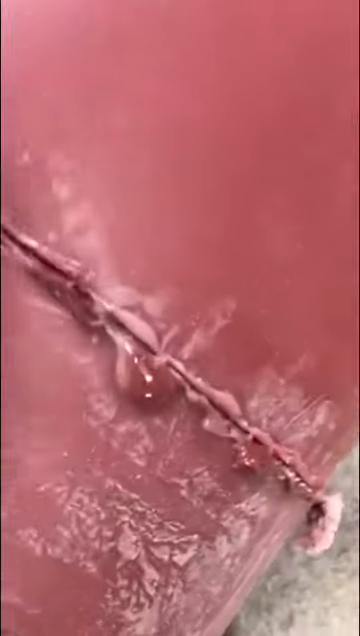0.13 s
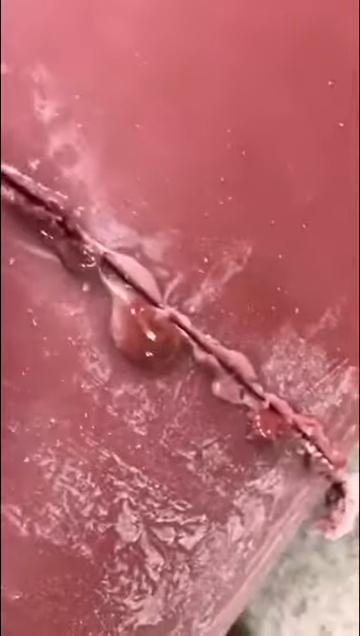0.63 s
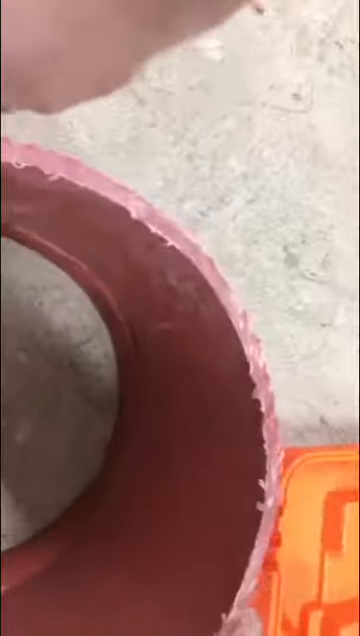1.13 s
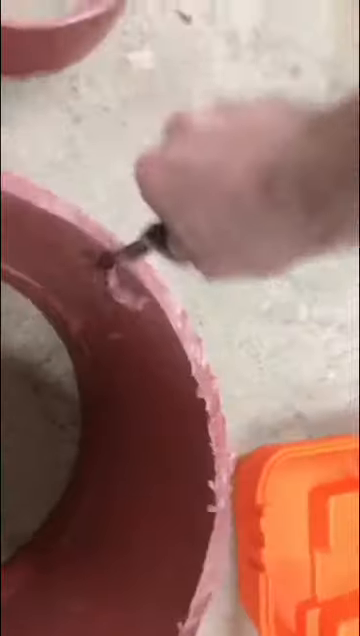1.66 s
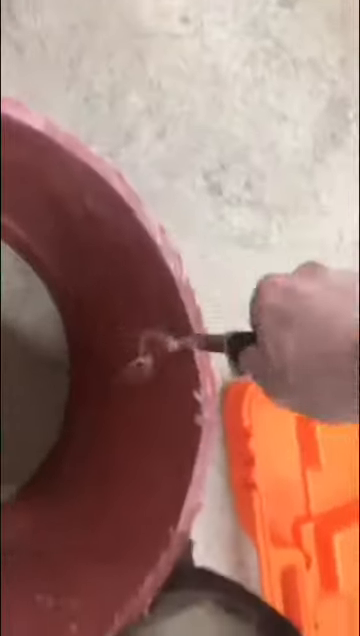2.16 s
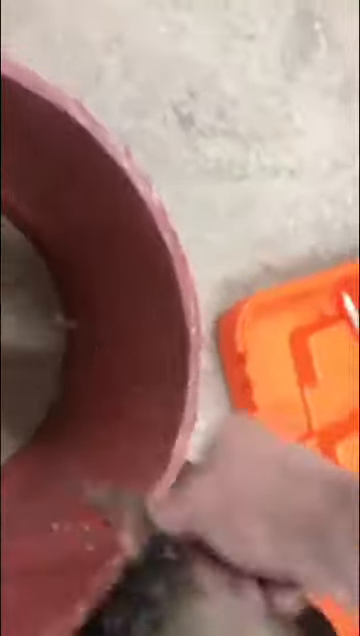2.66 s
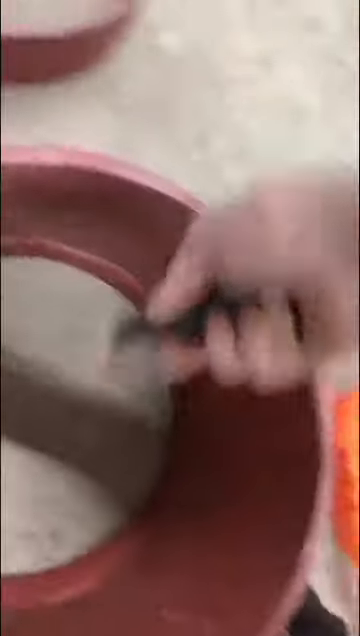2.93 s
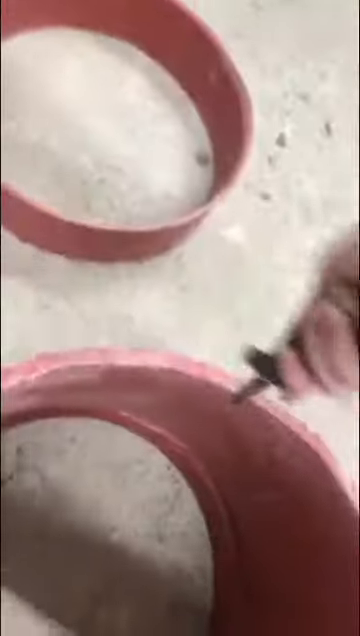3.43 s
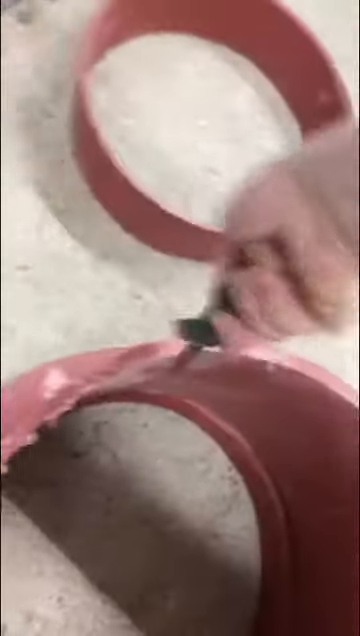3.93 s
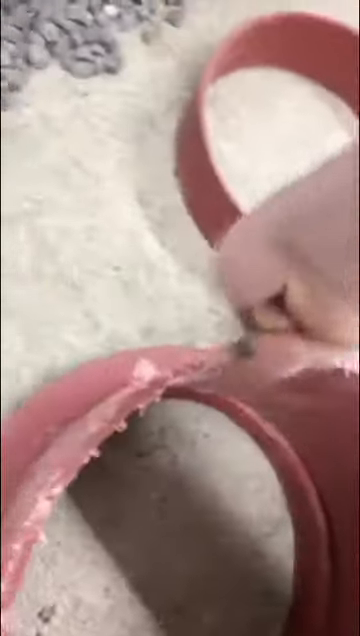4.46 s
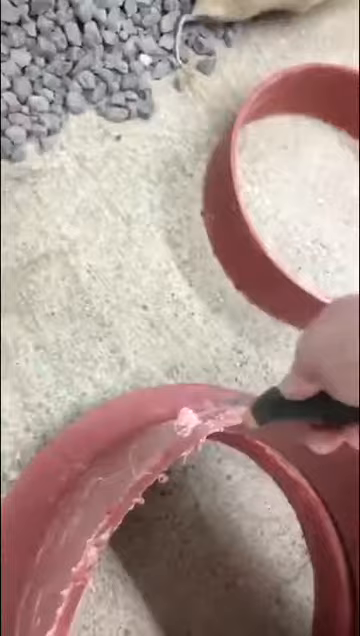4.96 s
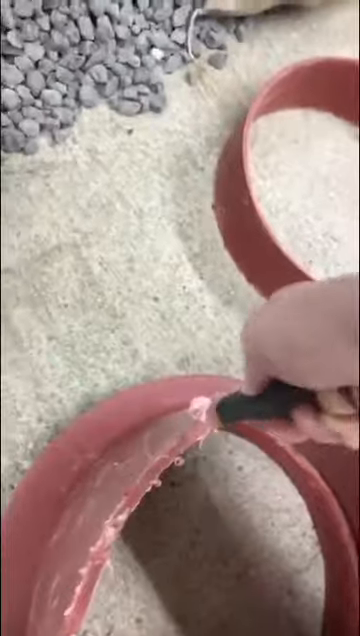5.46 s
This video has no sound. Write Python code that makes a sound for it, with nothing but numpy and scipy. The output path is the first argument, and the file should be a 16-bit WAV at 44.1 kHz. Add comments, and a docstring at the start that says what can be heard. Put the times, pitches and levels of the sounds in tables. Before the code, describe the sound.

An angle grinder roars harshly through plastic, cuts off abruptly into brief silence, then a hand blade knocks and scrapes along a hollow plastic barrel's edge.

```python
"""First an angle grinder whines through a plastic barrel: noise through disc resonances, beating with its shaft.
At 0.73 s the sound is cut off into a short silence. From 0.89 s a hand blade trims the barrel's edge close by:
force pulses ring the barrel's modes as knocks and rubs, and steady noise through the same modes scrapes.
A concrete basement answers as decaying noise, and swelling low noise is the handling of the microphone.
From 3.4 s the background hiss is a little quieter."""
import sys
import numpy as np
from scipy import signal
from scipy.fft import rfft, irfft, next_fast_len
from scipy.io import wavfile
from scipy.ndimage import uniform_filter1d, map_coordinates

SR = 44100
rng = np.random.default_rng(int(sys.argv[2]) if len(sys.argv) > 2 else 0)


def wav_out(sig):
    """Save sig, one row per channel (or a flat mono array), as 16-bit PCM at SR to the path in sys.argv[1]."""
    wavfile.write(sys.argv[1], SR, np.round(np.clip(np.atleast_2d(sig).T, -1, 1) * 32767).astype(np.int16))


def boost_factor(decibels):
    """Convert a level in decibels to a linear amplitude factor."""
    exponent = np.asarray(decibels, float) / 20
    return 10 ** exponent


N = 246518
T = np.arange(N) / SR  # s


def unit(x):
    """Normalisation: scale to rms 1."""
    return x / np.sqrt(np.mean(x ** 2) + 1e-20)


def along(points, hz):
    """Interpolation of (f/Hz, value) points on a logarithmic frequency axis."""
    f, values = np.transpose(points)
    return np.interp(np.log(hz + 1), np.log(f + 1), values)


def curves(rows):
    """Linear interpolation in time: one value per sample for each column after t/s."""
    s, *columns = np.transpose(rows)
    return [np.interp(T, s, column) for column in columns]


def wobble(rate):
    """Band-limited fluctuation: a smooth curve through random knots, rate knots a second."""
    knots = rng.standard_normal(int(N * rate / SR) + 4)
    return map_coordinates(knots, [T * rate])


def filtered(x, response):
    """Linear filtering: the spectrum of x times a response of frequency."""
    m = next_fast_len(N + SR // 2)
    spectrum = rfft(x, m) * response(np.fft.rfftfreq(m, 1 / SR))
    return irfft(spectrum, m)[..., :N]


def coloured(x, spectrum):
    """Spectral shaping: x with the colour of (f/Hz, level/dB) points, rms 1."""
    return unit(filtered(x, lambda f: boost_factor(along(spectrum, f))))


def resonance(f, hz, width):
    """Second-order resonance of gain 1 at its top; width is the bandwidth in Hz."""
    return 1j * f * width / (hz * hz - f * f + 1j * f * width)


def grit(spread_db, rate):
    """Amplitude-modulated noise: many small bites of uneven size."""
    return unit(rng.standard_normal(N) * boost_factor(spread_db * wobble(rate)))


def steady(x, seconds):
    """Envelope normalisation: x with its own slow swells evened out."""
    power = np.abs(uniform_filter1d(x ** 2, round(seconds * SR)))
    return x / np.sqrt(power + .05)


def swells(rows):
    """Gaussian envelopes: a gain that rises and falls once for each (t/s, level/dB, length/s) row."""
    return sum(boost_factor(db) * np.exp(-((T - s) / length) ** 2) for s, db, length in rows)


def add(track, s, sound):
    """Superposition: mix a sound into a track at a time in s."""
    track[round(s * SR):][:len(sound)] += sound


# colour of the quiet room's hiss: f/Hz, relative level/dB per Hz
ROOM_HISS = [(100, -4.5), (200, 7), (700, 5), (1100, 7.5), (2300, 3.5), (4500, -0.5), (8000, -4),
             (12000, -21), (15800, -34.5)]


def quiet_room():
    """Stationary background noise: coloured hiss with one small step down in level."""
    start_db = -63.5  # rms before the step
    hush_s, hush_db, fade_s = 3.4, -3.5, 0.1015
    step_db = hush_db * np.clip((T - hush_s) / fade_s, 0, 1)
    return boost_factor(start_db + step_db) * coloured(rng.standard_normal(N), ROOM_HISS)


# decay of the basement: f/Hz, t60/s
BASEMENT_DECAY = [(200, 1), (700, 0.66), (2000, 0.5), (5000, 0.22), (12000, 0.21)]


def basement(x, hop=8192):
    """Diffuse reverberation: each frequency decays at its own speed; each short stretch gets a fresh tail."""
    out, window = np.zeros(N + 2 * SR), signal.windows.hann(2 * hop, sym=False)
    for start in range(0, N, hop):
        hz, t, z = signal.stft(rng.standard_normal(SR), SR, nperseg=256)
        decay = boost_factor(-60 * t / along(BASEMENT_DECAY, hz)[:, None])
        tail = signal.istft(z * decay, SR, nperseg=256)[1]
        piece = x[start:start + 2 * hop]
        answer = signal.fftconvolve(piece * window[:len(piece)], tail / np.linalg.norm(tail))
        out[start + 300:][:len(answer)] += answer  # delay of 300 samples
    return out[:N]


# colours of sway and thud: f/Hz, relative level/dB per Hz
SWAY_COLOUR = [(12, 11), (25, 0.5), (45, 30), (65, -4.5), (90, -27.5)]
THUD_COLOUR = [(55, -14), (75, 12.5), (95, 12), (125, 6.5), (200, -11), (320, -10), (500, -68.5)]
# how restless the hands are: t/s, level/dB
RESTLESSNESS = [(0.9, -53.5), (1.5, -46), (2.1, -40), (2.8, -44.5), (3.2, -59.5), (3.55, -46.5), (4.1, -42),
                (4.9, -46.5), (5.59, -53)]
# the microphone sways: t/s, level/dB, length/s
SWAY_SWELLS = [(.92, -45.5, 0.035), (1.26, -39.5, 0.073), (1.47, -39, .06), (1.9, -49.5, .07),
               (2.05, -45.5, 0.01), (2.28, -37, 0.025), (2.52, -38.5, 0.034), (2.64, -39.5, .08),
               (3.05, -49.5, 0.16), (4.23, -31, 0.05), (4.48, -39.5, .05), (5.25, -59, 0.0752),
               (5.59, -35, .05)]
# dull thuds through the hand: t/s, level/dB, length/s
THUD_SWELLS = [(1.47, -44, 0.065), (1.98, -41.5, 0.092), (2.36, -50, 0.24), (2.58, -35, .05),
               (2.85, -60.5, 0.11), (4.23, -47.5, 0.13), (4.63, -30, 0.097), (4.84, -40.5, 0.2),
               (5.27, -48, 0.13)]


def rumble():
    """Low-frequency disturbance: handling and moving air push the microphone in low swells."""
    restless_db, = curves(RESTLESSNESS)
    sway = steady(coloured(rng.standard_normal(N), SWAY_COLOUR), seconds=0.28)
    thud = steady(coloured(rng.standard_normal(N), THUD_COLOUR), seconds=0.019)
    sway_gain = boost_factor(restless_db - 3) + swells(SWAY_SWELLS)
    thud_gain = boost_factor(restless_db) + swells(THUD_SWELLS)
    return sway_gain * sway + thud_gain * thud


# shaft orders and gear tones: multiple of the shaft rate, rms level/dB
SHAFT_ORDERS = [(0.998, -51), (2, -35), (3, -41), (3.681, -48.5), (5.65, -49.5)]
# broad colour of the grinding roar: f/Hz, relative level/dB per Hz
ROAR_COLOUR = [(25, -33.5), (100, -25), (400, -19), (1100, -13.5), (2000, -1.5), (2550, 2), (3200, -4.5),
               (3450, 0), (4000, -6), (4600, -2), (5000, -6.5), (5400, -4), (8000, -7.5), (12500, -14),
               (15800, -33)]
# disc and guard resonances: f/Hz, width/Hz, level/dB (relative to one another)
DISC_RESONANCES = [(5800, 330, -3.5), (6270, 290, -12.5), (6800, 35, 5.5), (8470, 160, 5), (9900, 88, -8)]
# a brief disc squeal: t/s, f/Hz, level/dB
DISC_SQUEAL = (0.048, 7050, -14)
# the cut's resonance climbs with depth and drops back as the disc shifts: t/s, f/Hz
CUT_RESONANCE = [(0.0, 2400), (0.448, 2520), (0.496, 2380), (0.72, 2590)]


def grinder():
    """Rotating-source noise: an abrasive roar through disc resonances beats with the shaft, over its tones."""
    shaft_hz = 158.8 * (1 + 0.0014 * wobble(18))
    turn = 2 * np.pi * np.cumsum(shaft_hz) / SR
    bites = grit(spread_db=0.6, rate=200) * (1 + 0.071 * np.cos(turn))  # the disc runs slightly out of true

    def disc(f):
        ringing = sum(boost_factor(db) * abs(resonance(f, hz, width)) for hz, width, db in DISC_RESONANCES)
        return boost_factor(along(ROAR_COLOUR, f)) * (1 + 0.49 * ringing)

    roar = unit(filtered(bites, disc))
    # the kerf resonates: low noise shifted up to a narrow band that drifts with the depth of the cut
    low_band = filtered(grit(spread_db=0.5, rate=180), lambda f: resonance(f, 120, 400) / (1 + (f / 320) ** 2))
    cut_hz, = curves(CUT_RESONANCE)
    carrier = np.sin(2 * np.pi * np.cumsum(cut_hz) / SR)
    kerf = steady(unit(low_band), seconds=0.0097) * carrier
    tones = sum(boost_factor(db + 1.2 * wobble(27)) * np.sqrt(2) * np.sin(order * turn) for order, db in SHAFT_ORDERS)
    s, hz, db = DISC_SQUEAL
    squeal = boost_factor(db) * wobble(540) * np.exp(-((T - s) / 0.012) ** 2) * np.sin(2 * np.pi * hz * T)
    return boost_factor(-13.5) * (0.85 * roar + 0.44 * kerf) + tones + squeal


# barrel modes, also rung by contact(): f/Hz, relative level/dB, t60/s
BARREL_MODES = [(191.4, -5, 0.14), (272.8, -6.5, 0.032), (362, -6.5, 0.036), (564, -5.5, 0.22),
                (677, -12, 0.017), (753.4, -3, 0.054), (855.3, -9.5, 0.019), (944.6, -4.5, 0.027),
                (1051, -12, 0.15), (1112.5, -8.5, 0.071), (1180, -10, 0.064), (1425, -15.5, 0.004),
                (1456, -4.5, 0.015), (1623, -10.5, 0.02), (1826, -12.5, 0.025), (2195, -8, 0.03),
                (2583, -14.5, 0.048), (2825, -17.5, 0.059), (3120, -24, 0.0043), (4080, -20, 0.054)]
# drag of the blade along the edge: t/s, level/dB
DRAG = [(0.95, -55), (1.07, -56.5), (1.36, -47), (1.58, -51), (1.8, -43), (2.08, -56), (2.26, -38.5),
        (2.38, -55), (2.51, -36.5), (2.66, -59), (2.8, -67.5), (3.15, -76), (3.39, -44.5), (3.58, -57),
        (3.72, -40), (3.9, -62), (4.12, -42), (4.45, -51.5), (4.65, -48.5), (4.8, -54.5), (5.01, -100),
        (5.17, -58), (5.33, -83), (5.59, -87)]
# colour of the shaving: f/Hz, relative level/dB per Hz
SHAVING_COLOUR = [(700, -11), (1400, 3), (2250, 0), (3300, 8.5), (5800, 15), (8000, 1.5), (12000, 3.5),
                  (15800, -23.5)]


def scrape():
    """Stick-slip excitation: the dragged blade excites the barrel's modes; the curling shaving crackles."""
    drag_db, = curves(DRAG)

    def body(f):
        total = 0
        for k, (hz, db, t60) in enumerate(BARREL_MODES):
            width = 2 * np.log(1000) / (np.pi * t60)  # Hz, from the decay time
            total = total + boost_factor(db) * resonance(f, hz, width) * (-1) ** k
        return total

    slips = boost_factor(2.5 * wobble(50))
    drag = unit(filtered(slips * grit(spread_db=4, rate=200), body))
    crackle = coloured(slips * grit(spread_db=3, rate=220), SHAVING_COLOUR)
    # the shaving fades out from 4.7 s to 4.9 s; afterwards the blade only touches the rim
    shaving = np.clip((4.9 - T) / .2, .05, 1)
    return boost_factor(drag_db) * (drag + boost_factor(-10.5) * shaving * crackle)


# borders of the mode groups wall, body and high: f/Hz
GROUP_BORDERS = [450, 1400]


def feed(pitch_hz, high_db):
    """Modal selectivity: dB fed to each mode, least to the wall, body modes around the favoured pitch."""
    below_db, above_db = 25.5, 21.5  # fall per octave under and over the favoured pitch
    hz = np.transpose(BARREL_MODES)[0][:, None]
    octaves = np.log2(hz / pitch_hz)
    body_db = np.where(octaves < 0, below_db, -above_db) * octaves
    return np.choose(np.searchsorted(GROUP_BORDERS, hz), [-60, body_db, high_db])


def contact(s, feed_db, rise, rough):
    """Modal synthesis: a force pulse feeds decaying modes whose phases it jolts; returns ring and force."""
    t = np.arange(SR // 4) / SR
    hz, mode_db, t60 = np.transpose(BARREL_MODES)[:, :, None]
    t60 = t60 * (0.59 if s > 4.4 else 1)  # from 4.4 s a hand presses the barrel and shortens its ring
    luck = rng.standard_normal((3, len(BARREL_MODES), 1))
    jolts = rng.standard_normal((len(BARREL_MODES), len(t)))
    force = t / rise * np.exp(1 - t / rise)  # peaks at 1 after the rise time in s
    fade = boost_factor(-60 * t / np.clip(t60, .015, 1)) ** 2
    swing = np.sqrt(fade * np.cumsum(force ** 2 / fade, axis=1))  # energy fed in, minus energy lost
    envelope = swing / swing.max(axis=1, keepdims=True)
    wander = rough * np.cumsum((force + 0.11) * jolts, axis=1)
    phase = 2 * np.pi * hz * (1 + 0.028 * luck[1]) * t + luck[2] + wander
    level_db = mode_db + feed_db + 2 * luck[0]
    return np.sum(boost_factor(level_db) * envelope * np.sin(phase), axis=0), force


# sharp knocks of the blade: t/s, level/dB, favoured pitch f/Hz,
# high modes level/dB and snap level/dB (both relative to the knock; the snap before a common offset)
BLADE_KNOCKS = [(1.191, -22, 1114, -6, -19), (1.202, -7, 1066, -15.5, -28.5), (1.23, -15, 1020, -15, -16),
                (1.467, -35.5, 876, -26, -28), (1.831, -26.5, 1076, -17.5, -25.5),
                (2.182, -14, 566, -14, -22), (2.201, -10.5, 913, -20.5, -28.5),
                (2.283, -28.5, 592, -13.5, -22), (2.464, -21.5, 1250, -3, -11.5), (2.484, -26, 560, -5, -6),
                (2.603, -30.5, 1053, -5.5, -2.5), (2.708, -48.5, 822, -8, 2.5), (2.791, -49, 957, 2.5, 3.5),
                (2.827, -58, 930, 10.5, 9.5), (3.011, -67, 770, 1, 26), (3.218, -18.5, 1062, -25, -48.5),
                (3.497, -24.5, 1058, -8, -19.5), (3.523, -30, 1080, -9, -14), (3.696, -18, 1078, -5, -7.5),
                (3.712, -12, 787, -20.5, -22.5), (3.925, -17, 853, -5, -8.5),
                (4.058, -31.5, 753, -16.5, -12), (4.129, -23.5, 1029, -12.5, -13),
                (4.194, -17.5, 851, -6, 1), (4.248, -24.5, 1038, -9, 5), (4.461, -29.5, 726, -3.5, -6),
                (4.509, -3.5, 885, -18, -28), (4.652, -29.5, 1010, -6, 1), (4.996, -28.5, 1000, -18, -35),
                (5.088, -48, 900, -2.5, -13.5), (5.194, -31.5, 956, -10.5, -32)]
# the whole wall thumps when the barrel is pushed: t/s, level/dB
WALL_THUMPS = [(1.236, -30), (1.831, -32), (2.192, -28), (2.486, -22), (3.712, -26.5), (3.924, -28.5),
               (4.171, -54.5), (4.508, -19.5)]


def knocks():
    """Impact excitation: knocks ring the barrel and snap on the blade; pushes move mainly the wall."""
    body, snaps = np.zeros(N + SR), np.zeros(N + SR)
    for s, db, pitch_hz, high_db, snap_db in BLADE_KNOCKS:
        ring, force = contact(s, feed(pitch_hz, high_db), rise=0.0018, rough=0.072)
        add(body, s, boost_factor(db) * ring)
        add(snaps, s, boost_factor(db + snap_db + 2.5) * force * rng.standard_normal(len(ring)))
    mode_hz = np.transpose(BARREL_MODES)[0][:, None]
    wall_db = np.where(mode_hz < GROUP_BORDERS[0], 0, -60)
    for s, db in WALL_THUMPS:
        ring, _ = contact(s, wall_db, rise=0.0029, rough=0.054)
        add(body, s, boost_factor(db) * ring)
    return body, snaps


# short rubs where the blade bites and slips: t/s, level/dB, favoured pitch f/Hz,
# high modes level/dB and rasp level/dB (both relative to the rub; the rasp before a common offset)
BLADE_RUBS = [(1.37, -29.5, 1150, -22.5, -24), (1.441, -29.5, 944, -20, -35), (1.542, -37, 1010, -10, -5.5),
              (1.582, -37, 1032, -8, 2.5), (1.72, -36.5, 1090, -9.5, -16.5), (1.797, -37, 956, -34, -16),
              (1.906, -38, 1020, -26, -15), (2.002, -29.5, 1080, -13, -13), (2.134, -31.5, 533, -18, -28),
              (2.249, -30, 542, -27, -21.5), (2.362, -27, 510, -6, -1), (2.389, -32, 537, -7.5, -9.5),
              (2.506, -29.5, 734, -15.5, -23.5), (2.534, -29, 934, -24, -26.5),
              (3.344, -34, 1080, -7.5, -14), (3.373, -30.5, 1090, -14, -26), (3.41, -48.5, 1100, 1, -14),
              (3.46, -27.5, 960, -7, -10.5), (3.613, -31.5, 1150, -5, 2.5), (3.647, -36.5, 787, -7, -7.5),
              (3.899, -28, 986, -1.5, -14), (4.152, -21, 940, -14, -16), (4.165, -15.5, 1120, -17, -30.5),
              (4.176, -21, 770, -12.5, 1), (4.202, -25, 774, 0, -7), (4.224, -26.5, 1001, -3, 4),
              (4.978, -40.5, 1060, -21, -34.5), (5.072, -40.5, 579, -12, -34),
              (5.156, -52.5, 780, -10.5, -8.5), (5.177, -35.5, 885, -12.5, -31),
              (5.533, -39, 1050, -12, -1), (5.545, -23.5, 1030, -17, -9.5)]
# filter for the snap and rasp of the blade: f/Hz, gain level/dB
SNAP_COLOUR = [(800, -47.5), (2000, -6.5), (3500, -6.5), (5500, 2), (9000, -9.5), (15800, -19)]


def blade():
    """Friction excitation: slow, rough force pulses blur the barrel's ring and rasp; they join the knocks."""
    body, snaps = knocks()
    rasp = np.resize(grit(spread_db=3, rate=700), N + SR)
    rise = .007  # s, a rub swells far more slowly than a knock
    for s, db, pitch_hz, high_db, rasp_db in BLADE_RUBS:
        ring, force = contact(s, feed(pitch_hz, high_db), rise, rough=0.14)
        start = s - .6 * rise  # the bite builds up before it is heard
        unevenness = map_coordinates(rng.standard_normal(60), [np.arange(len(ring)) * 200 / SR])
        chatter = boost_factor(unevenness * force)  # 1 dB deep, 200 knots a second
        add(body, start, boost_factor(db) * ring * chatter)
        add(snaps, start, boost_factor(db + rasp_db - 7.0) * force * rasp[round(s * SR):][:len(ring)])
    return body[:N] + filtered(snaps[:N], lambda f: boost_factor(along(SNAP_COLOUR, f)))


# sound is switched off and on again: off t/s, on t/s
OFF_AND_ON = (0.7273, .894)


def scene():
    """Superposition in time: the grinder until the silence, the trimming after it."""
    off, on = OFF_AND_ON
    near = blade()
    echo = boost_factor(-9) * basement(near)
    trimming = near + echo + scrape() + rumble() + quiet_room()
    stop = np.where(T < off, 1, boost_factor(-13 - 4700 * np.abs(T - off)))  # an abrupt stop with a trace of tail
    start = np.clip((T - on) / 0.014, 0, 1)
    return (grinder() * stop + trimming * start)[None]


def band_limit(x):
    """A steep low-pass at the top of the band."""
    return signal.sosfilt(signal.butter(12, 17080, fs=SR, output="sos"), x)


def record(dry):
    """Saturation and band limitation: a small microphone rounds the loudest peaks and ends at 15870 Hz."""
    soft = dry / (1 + np.abs(dry / .9) ** 4) ** .25
    mix = filtered(soft, lambda f: f < 15870)
    return band_limit(mix)


dry = scene()
out = record(dry)
wav_out(out)
```